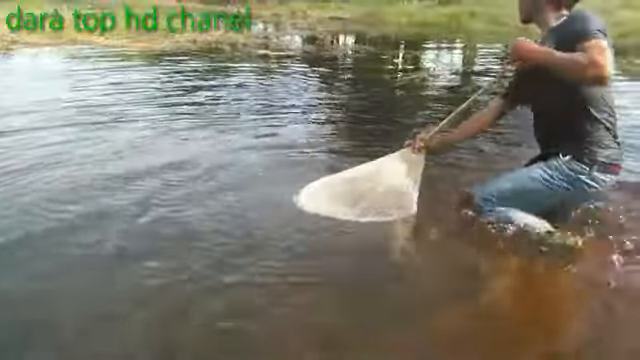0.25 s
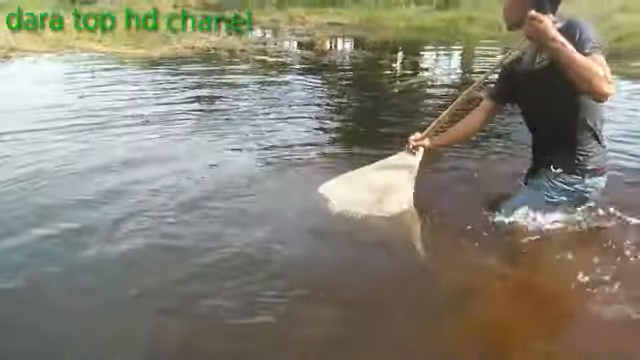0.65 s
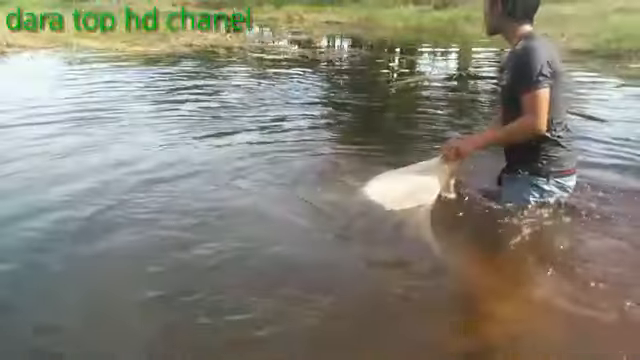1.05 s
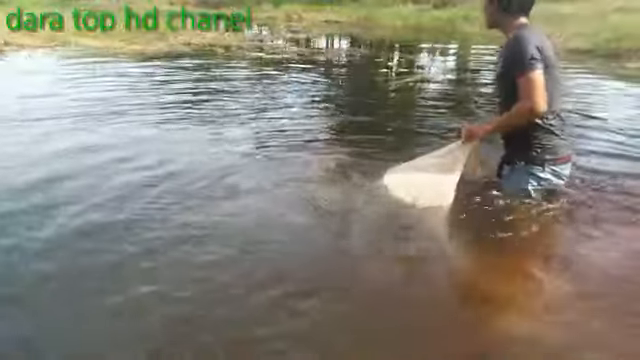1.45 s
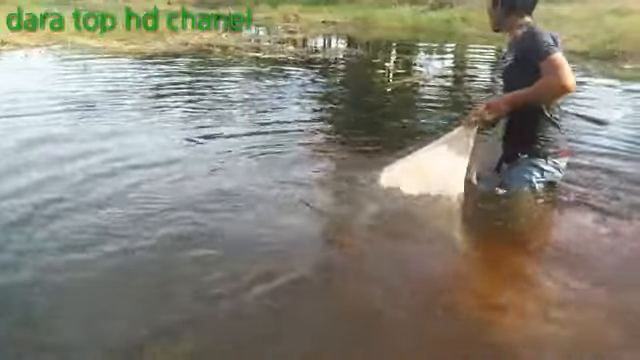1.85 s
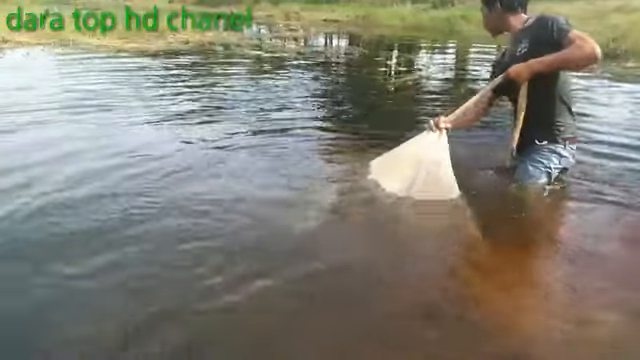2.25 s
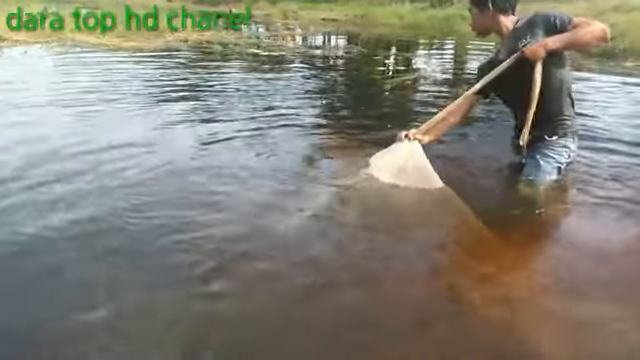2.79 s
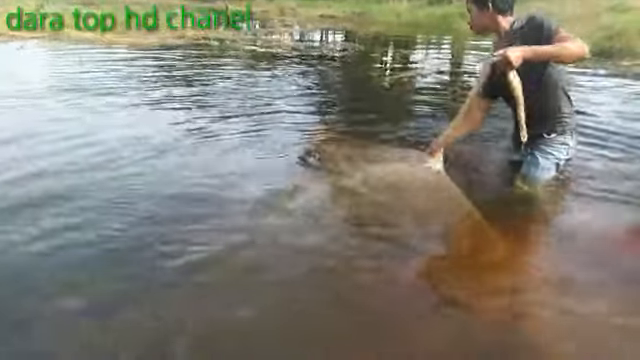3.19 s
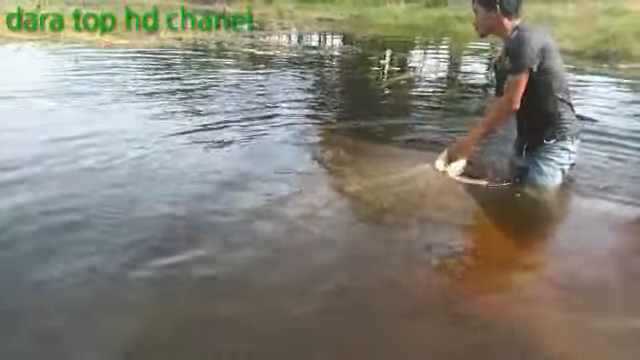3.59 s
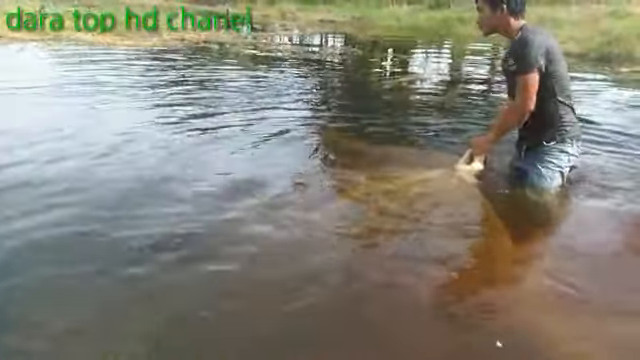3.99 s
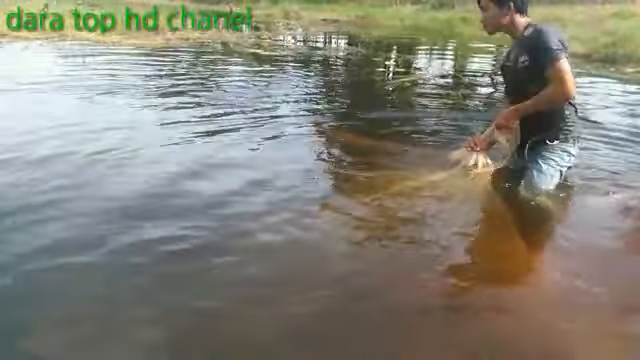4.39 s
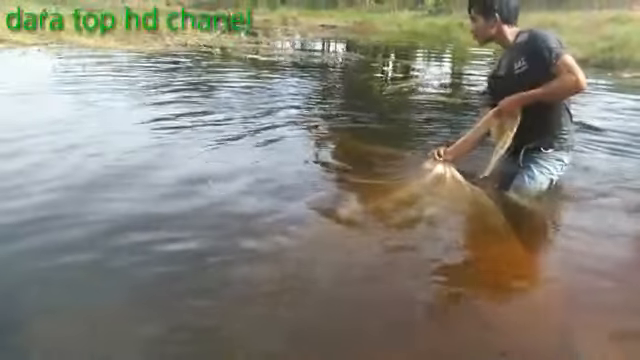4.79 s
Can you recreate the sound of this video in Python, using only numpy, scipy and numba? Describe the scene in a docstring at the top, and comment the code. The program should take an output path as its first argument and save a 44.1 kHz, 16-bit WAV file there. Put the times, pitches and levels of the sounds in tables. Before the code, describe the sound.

A net is hauled through a shallow pond, close to the microphone and slightly right. From about 0.2 to 1.2 seconds the water splashes, gurgles and fizzes around legs and mesh, strongest near half a second. Softer gurgles and drips follow until about 2.4 seconds, then sparse drops and a thin draining hiss, with another small slosh from 4.5 to 5 seconds. Throughout, a one-cylinder pump engine thumps on the left, about eight beats a second. A faster engine throbs farther off, swelling with raspy barks between 1.7 and 2.5 seconds. Sharp dry ticks sound close on the left at the very start, twice around 0.75 seconds and at 3.9. On the right, a frog trills briefly near 2 and 4.5 seconds, and a bird chirps faintly at 2.3 and around 4 to 4.7. Light wind, low distant rumble and very faint insects lie underneath.

```python
"""A shallow pond, where a net is hauled through the water just right of a camera.
Bubbles ring as damped oscillators, so the water gurgles, drips and fizzes around legs and mesh.
Firings excite exhaust resonances: a slow one-cylinder pump engine thumps on the left bank, and a
faster engine throbs further off and barks when revved. A frog trills twice, a bird chirps and
insects sing; a few sharp ticks sound close by, over light wind and distant noise."""
import sys
import numpy as np
from scipy import signal
from scipy.fft import rfft, irfft
from scipy.io import wavfile
from scipy.ndimage import uniform_filter1d, map_coordinates
from numba import njit

SR = 44100
rng = np.random.default_rng(int(sys.argv[2]) if len(sys.argv) > 2 else 0)


def int16_out(signal):
    """Quantize to a 16-bit WAV file."""
    q = np.round(np.clip(np.atleast_2d(signal).T, -1, 1) * 32767)
    wavfile.write(sys.argv[1], SR, q.astype(np.int16))


N = 222352
TOP_HZ = 15950  # upper band limit


def undb(db):
    """Amplitude ratio of a level in decibels."""
    return 10 ** (np.asarray(db, float) / 20)


def unit(x):
    """Normalisation to an RMS of 1."""
    return x / np.sqrt(np.mean(x ** 2))


def curve(table):
    """Linear interpolation in time: one signal for each column after t/s."""
    s, *columns = np.transpose(table)
    return [np.interp(np.arange(N) / SR, s, column) for column in columns]


def on_log(table, hz):
    """Interpolation on a logarithmic frequency axis."""
    f, values = np.transpose(table)
    return np.interp(np.log(hz), np.log(f), values)


def band(x, hz, width):
    """Second-order resonance with gain 1 at its centre."""
    return signal.lfilter(*signal.iirpeak(hz, hz / width, SR), x)


def steep_band(x, hz, width):
    """Two equal resonances in cascade."""
    return band(band(x, hz, width), hz, width)


def walk(rate):
    """Random modulation: values held for 1 / rate s and smoothed twice; spread near 1."""
    hold = int(SR / rate)
    steps = np.repeat(rng.standard_normal(N // hold + 1), hold)
    return 1.3 * uniform_filter1d(uniform_filter1d(steps, hold), hold)[:N]


@njit
def add_rings(out, start, hz, t60, rise, glide, left, right, lag):
    """Superposition of decaying sinusoids, each gliding by a share of its frequency over its t60."""
    for k in range(len(start)):
        length, phase = t60[k] * SR, 0.
        for n in range(int(length)):
            i = start[k] + n
            if i + lag >= out.shape[1]:
                break
            phase += 2 * np.pi * hz[k] * (1 + glide[k] * n / length) / SR
            swell = (1 - np.exp(-(n + 1) / (rise[k] * SR))) ** 2
            pressure = np.sin(phase) * 1000 ** (-n / length) * swell
            out[0, i + lag] += left[k] * pressure
            out[1, i] += right[k] * pressure


def rings(s, hz, db, t60, pan_db, rise=1e-4, glide=0., lag=0):
    """Damped oscillators at two microphone ports: pan is left minus right; left is `lag` samples late."""
    out = np.zeros((2, N))
    columns = np.broadcast_arrays(s, hz, db, t60, pan_db, rise, glide)
    s, hz, db, t60, pan_db, rise, glide = (1. * column for column in columns)
    left, right = undb(db + pan_db / 2), undb(db - pan_db / 2)
    add_rings(out, (s * SR).astype(np.int64), hz, t60, np.maximum(rise, 1e-5), glide, left, right, lag)
    return out


def shade(hz):
    """Acoustic shadow of the camera: left minus right falls 2 dB per octave above 600 Hz."""
    return -2 * np.maximum(np.log2(hz / 600), 0)


def wobble(x, depth_s, rate):
    """Phase modulation: moving water or air varies the path length, which roughens the pitch."""
    place = np.arange(N) + depth_s * SR * walk(rate)
    return np.array([map_coordinates(port, [place], order=3, mode="nearest") for port in x])


def bubbles(count, centre_hz, octaves, cycles, spread_db, pan_db, pan_spread_db, lag):
    """Bubble resonance in a crowd: each of uneven size, ringing about `cycles` periods and gliding up."""
    when, pitch, size, side, life = rng.random((count, 5)).T
    hz = np.broadcast_to(centre_hz, N)[(when * N).astype(int)] * 2 ** (octaves * (pitch - .5))
    t60 = cycles * (.5 + life) / hz
    db = -spread_db * np.log(1 - size)
    pan = pan_db + pan_spread_db * (2 * side - 1)
    return unit(rings(when * N / SR, hz, db, t60, pan, rise=0.044 / hz, glide=0.068, lag=lag))


def wash():
    """Bubble resonance rises as size falls: air pockets gurgle, the surface sloshes, fine drops fizz."""
    # moving water: t/s, gurgle level/dB, slosh level/dB
    water_levels = [(0, -45, -50), (.15, -49.5, -49.5), (.3, -39, -39.5), (.42, -41, -36.5),
                    (.53, -46.5, -37.5), (.67, -39.5, -39.5), (.86, -36.5, -39.5), (.95, -45.5, -48),
                    (1.15, -50.5, -52.5), (1.25, -57, -50.5), (1.6, -50, -60.5), (1.72, -41.5, -48),
                    (1.86, -54, -50.5), (2.05, -41.5, -47.5), (2.27, -42.5, -48.5), (2.36, -42.5, -44),
                    (2.44, -50.5, -51.5), (3.0, -53, -58), (3.85, -50.5, -59.5), (4.2, -57.5, -63),
                    (4.47, -50.5, -55.5), (4.55, -49, -50.5), (4.78, -55.5, -57), (4.86, -45, -52),
                    (5.04, -48, -50.5)]
    # pockets of air under the net: t/s, f/Hz
    pocket_pitch = [(0, 654), (.9, 650), (1.1, 670), (2.3, 625), (4.4, 503), (4.75, 670), (4.85, 830),
                    (5.04, 780)]
    # bubble sizes that the slosh favours: f/Hz, spread/octaves, level/dB
    slosh_bands = [(1098, 0.2, -10), (1896, 0.58, -2), (2563, 0.41, -1.5), (3220, 0.48, -10)]
    gurgle_db, slosh_db = curve(water_levels)
    gurgle_hz, = curve(pocket_pitch)
    fizz_db = -48 + 0.85 * (slosh_db + 40)  # follows the slosh
    lumps_db = 1.5 * walk(35)
    gurgle = bubbles(2000, gurgle_hz, 0.29, cycles=8.5, spread_db=2, pan_db=-.5, pan_spread_db=12, lag=2)
    glug = bubbles(1200, 460, octaves=1, cycles=7.4, spread_db=2, pan_db=3, pan_spread_db=1, lag=1)
    crackle = bubbles(30000, 1830, 2.14, cycles=23, spread_db=-1.5, pan_db=2.5, pan_spread_db=92, lag=6)
    slosh = sum(
        undb(db) * bubbles(1500, hz, octaves, cycles=40, spread_db=2, pan_db=-2.5, pan_spread_db=13, lag=6)
        for hz, octaves, db in slosh_bands)
    fizz = bubbles(18000, 5030, 1.71, cycles=25, spread_db=1.5, pan_db=-4, pan_spread_db=28, lag=6)
    plinks = bubbles(900, 2186, 1.49, cycles=25, spread_db=2.5, pan_db=0, pan_spread_db=16, lag=5)
    deep = (gurgle + undb(-12) * glug) * undb(gurgle_db)
    surface = (unit(slosh) + undb(-4.5) * crackle + undb(-12.5) * plinks) * undb(slosh_db)
    return (deep + surface + fizz * undb(fizz_db)) * undb(lumps_db)


def drops():
    """Single bubbles resonate, along with a few rattles from the fast engine's hard firings; the moving surface
    modulates them and scatters a short blur after them."""
    # prominent bubbles: t/s, f/Hz, level/dB, t60/s, glide as a share of f # the rows at 1.698 s, 1.963 s and
    # 2.025 s are instead ringing rattles set off by the fast engine's hard firings
    single_bubbles = [(.051, 2170, -31.5, 0.071, -0.21), (0.21, 2670, -21, 0.0091, 0.21),
                      (.229, 676, -10.5, 0.078, 0.74), (.311, 1780, -31, 0.018, -0.2),
                      (0.33, 2540, -25, 0.022, 0.048), (.345, 1720, -9, 0.0232, 0.56),
                      (0.387, 1780, -23, 0.016, 0.076), (.418, 2010, -27, 0.019, 0.52),
                      (.422, 617, -24, 0.25, -0.75), (0.433, 2820, -19.5, .025, 0.039),
                      (0.472, 5140, -23, 0.015, 0.009), (.478, 5000, -24, 0.016, 0.34),
                      (0.485, 4050, -32, 0.016, 0), (.483, 1810, -21, 0.016, 0.072),
                      (0.467, 1230, -23.5, 0.075, -0.39), (.513, 5140, -37, 0.015, -0.087),
                      (.517, 5070, -15, 0.024, 0.2), (0.517, 2560, -20, 0.024, 0.25),
                      (.534, 5200, -35, .015, -0.27), (.54, 5040, -24, .015, 0.0069),
                      (.547, 4800, -26, .012, 0.14), (0.539, 2850, -20, .015, -0.086),
                      (0.552, 2460, -20, 0.017, -0.24), (.567, 6300, -34, 0.0066, -0.39),
                      (.569, 5000, -23, .01, -0.1), (0.577, 2520, -28, 0.047, -0.44),
                      (.596, 885, -15.5, 0.031, -0.73), (0.602, 2420, -25, 0.012, 0.17),
                      (.612, 2740, -20, 0.019, -0.23), (0.62, 500, -4, 0.015, 0.98),
                      (.621, 1850, -26, 0.013, -0.22), (.66, 2200, -24, 0.019, .2),
                      (.69, 2520, -24, .02, 0.095), (0.721, 525, -19, 0.049, -0.16),
                      (.896, 1530, -25, .02, -0.31), (0.927, 1070, -24.5, 0.023, .1),
                      (0.939, 1400, -31, 0.03, 0), (1.096, 1310, -35, 0.049, -0.17),
                      (1.112, 1480, -38, 0.042, 0), (1.117, 680, -30.5, 0.05, 0.0093),
                      (1.14, 1430, -37, 0.034, -0.2), (1.18, 948, -38.5, 0.03, 0.15),
                      (1.263, 547, -33, 0.054, 0.2), (1.963, 2400, -26, 0.054, -0.36),
                      (2.025, 3080, -46, 0.018, -0.036), (4.182, 2770, -27.5, 0.0065, 0.59),
                      (4.182, 4160, -35, 0.014, -0.47), (4.737, 1254, -35, 0.018, -0.54),
                      (4.748, 2980, -41, 0.058, -0.31), (4.758, 1610, -49, 0.12, 0),
                      (4.85, 2740, -46, 0.124, 0.37), (4.896, 802, -32.5, 0.14, -0.0049),
                      (4.91, 430, -33.5, 0.19, 0.33), (4.937, 790, -34.5, 0.12, -0.012),
                      (5.007, 807, -36.5, 0.31, 0.41), (5.011, 420, -29.5, 0.052, 0.26),
                      (4.894, 4670, -33, .012, 0), (4.896, 3600, -34, 0.018, 0.43),
                      (4.794, 5070, -33, .012, 0), (4.783, 3320, -38, 0.02, 0.39),
                      (.434, 798, -17.5, 0.086, -0.29), (.443, 2300, -17, 0.024, 0.27),
                      (.458, 593, -20.5, 0.063, 0.25), (0.461, 2050, -9, 0.0219, -0.44),
                      (0.474, 1794, -10.5, 0.02, 0.035), (.48, 2600, -18, 0.021, 0.43),
                      (0.503, 1146, -19, 0.044, 0.38), (0.506, 2010, 4.5, 0.0043, 0.51),
                      (0.507, 672, -12.5, 0.039, -0.48), (.601, 610, -14.5, 0.03, 0.59),
                      (0.615, 1410, -18, 0.012, 1), (0.627, 2230, -17, 0.026, 0.84),
                      (.642, 664, -12.5, 0.038, 0.2), (.7, 2430, -27, 0.044, 0.13),
                      (.18, 887, -34, 0.054, 0.3), (.93, 618, -25.5, 0.061, 0.22),
                      (0.717, 1190, -25, 0.043, -0.41), (0.764, 970, -23, 0.061, -0.046),
                      (.816, 807, -20.5, 0.057, 0.14), (.843, 2400, -12, 0.019, -0.042),
                      (0.843, 1400, -19, 0.024, 0.23), (.859, 696, -21, 0.13, -0.37),
                      (0.866, 2118, -11, 0.0095, 0.029), (0.882, 1236, -25.5, 0.078, -0.07),
                      (0.97, 1040, -19.5, 0.073, 0.099), (0.986, 1420, -20, 0.02, 0.39),
                      (1.036, 528, -16, 0.03, 0.75), (1.064, 636, -23.5, 0.14, -0.17),
                      (1.156, 1370, -32.5, 0.031, -0.45), (1.18, 2870, -19.5, 0.007, 0.4),
                      (1.18, 3990, -22.5, 0.011, 0.33), (1.231, 567, -27.5, 0.065, -0.014),
                      (1.311, 2120, -22, 0.024, -0.064), (1.314, 1186, -24.5, 0.044, 0.14),
                      (1.423, 2330, -36, 0.041, 0.035), (1.651, 926, -23.5, 0.028, 0.032),
                      (1.698, 2288, -25, 0.0194, 0.1), (1.963, 648, -29, 0.068, -0.52),
                      (2.195, 626, -22.5, 0.057, 0.464), (2.341, 880, -25, 0.036, -0.42),
                      (2.647, 2380, -35, 0.02, -0.32), (2.757, 1730, -28, 0.016, 0.3),
                      (2.758, 6400, -24, 0.011, 0.091), (2.98, 2970, -38.5, 0.025, -0.012),
                      (3.19, 4740, -35, 0.017, 0), (3.264, 3840, -32, 0.017, 0.24),
                      (3.265, 2950, -40, 0.017, 0.14), (3.525, 1613, -43.5, 0.059, -0.074),
                      (3.484, 1565, -29.5, 0.038, 0.47), (3.484, 3400, -39, 0.026, 0.24),
                      (3.577, 2400, -42, 0.021, -0.11), (3.769, 523, -30, 0.059, 0.26),
                      (3.854, 1860, -23, 0.0081, 0.24), (4.492, 3130, -36, 0.027, -0.032),
                      (4.561, 2640, -33, 0.042, -0.0059), (4.66, 1146, -22.5, 0.018, -0.13),
                      (4.662, 2810, -18.5, 0.021, 0.48), (4.666, 3480, -27, .015, 0),
                      (4.698, 3250, -21, 0.023, 0.047), (4.796, 2260, -40, 0.03, 0.92),
                      (4.531, 906, -39, 0.11, 0.44), (4.832, 890, -30.5, 0.035, -0.11),
                      (4.881, 2360, -21, 0.011, -0.28), (4.88, 830, -19, 0.027, 0.39),
                      (4.92, 3610, -23.5, 0.014, 0.053), (4.939, 2400, -34, 0.031, 0.15),
                      (4.957, 1256, -36.5, 0.062, 0.074), (4.958, 2600, -33, 0.014, 0.09)]
    s, hz, db, t60, glide = np.transpose(single_bubbles)
    flutter_db = 2.5 * walk(260)
    rise = 0.47 / hz + .02 * t60  # deeper bubbles start more softly
    direct = rings(s - .0025, hz, db, t60, shade(hz), rise, glide, lag=4) * undb(flutter_db)
    direct = wobble(direct, depth_s=.00005, rate=300)
    t, scatter_t60 = np.arange(int(.06 * SR)) / SR, 0.11
    ripples = rng.standard_normal((2, len(t))) * 1000 ** (-t / scatter_t60)
    return direct + undb(-37) * signal.fftconvolve(direct, ripples, axes=1)[:, :N]


def bursts():
    """Band-limited transients: grainy noise swells and decays; higher bursts are wider and rise faster."""
    # short noisy bursts (water slaps, fine spray and a few engine rasps):
    # t/s, peak level/dB, centre f/Hz, t60/s
    noisy_bursts = [(0.2074, -31, 5100, 0.19), (0.307, -33, 2040, 0.21), (.3605, -30, 4870, 0.031),
                    (.428, -36, 2330, .08), (.4594, -13, 1874, 0.2), (0.4715, -27, 4970, 0.15),
                    (0.494, -21, 2020, 0.113), (.5094, -31, 5134, 0.13), (0.537, -33, 4940, 0.036),
                    (0.565, -30, 5100, 0.019), (0.602, -12.5, 1920, 0.13), (0.6206, -23, 2020, 0.074),
                    (0.633, -23, 5070, .03), (0.689, -20.5, 1970, 0.44), (0.758, -21.5, 2050, 0.072),
                    (0.84, -43.5, 1930, .075), (0.871, -36, 8550, 0.15), (1.052, -32, 9350, 0.062),
                    (1.099, -35, 8700, .036), (1.171, -28, 7560, 0.091), (1.283, -38, 8300, 0.35),
                    (1.07, -38, 3100, 0.044), (1.6934, -38, 2282, 0.099), (2.174, -33, 1810, 0.083),
                    (2.345, -41, 1080, .08), (2.3244, -38, 9900, 0.042), (2.3255, -29.5, 2010, 0.15),
                    (2.755, -41, 5760, 0.18), (3.282, -39, 6550, 0.43), (3.527, -38, 8000, 0.17),
                    (3.906, -37, 2150, 0.28), (4.6994, -47, 4970, 0.1), (4.893, -39, 7050, 0.057)]
    out = np.zeros((2, N))
    t = np.arange(int(.3 * SR)) / SR
    flock = bubbles(5000, 2244, 2.45, cycles=6.1, spread_db=1.5, pan_db=-9.5, pan_spread_db=12, lag=5)
    for s, db, hz, t60 in noisy_bursts:
        rise = .008 * np.sqrt(2000 / hz)
        width_hz = hz * min(0.93 * hz / 2000, 1.44)
        i = int((s - rise) * SR)
        noise = rng.standard_normal((2, len(t)))
        grain_db = 0.21 * np.repeat(rng.standard_normal(len(t) // 60 + 1), 60)[:len(t)]
        grains = noise * undb(grain_db) + undb(-8) * np.roll(flock, -i, axis=1)[:, :len(t)]
        burst = steep_band(grains, hz, width_hz) * (1 - np.exp(-t / rise)) ** 2 * 1000 ** (-t / t60)
        port_db = db + shade(hz) * np.array([[.5], [-.5]])
        out[:, i:i + len(t)] += (burst / np.abs(burst).max() * undb(port_db))[:, :N - i]
    return out


def snaps():
    """Impact excitation: each fine droplet sets off six very short rings around a centre frequency."""
    # droplets striking the surface: t/s, level/dB, centre f/Hz
    impacts = [(0.208, -42, 7100), (.265, -42, 8050), (.363, -36, 8100), (.384, -40.5, 7460),
               (.406, -42, 9950), (.414, -35, 9200), (.459, -36, 9000), (.477, -40, 9400),
               (0.503, -34.5, 10400), (.538, -45, 9400), (.566, -32, 9800), (.607, -33, 9900),
               (.633, -39, 8450), (0.647, -40, 8900), (0.885, -38, 10400), (1.055, -33, 9300),
               (1.178, -31.5, 9550), (2.755, -38, 5100), (3.282, -45, 7960), (3.289, -32.5, 5240),
               (3.315, -53, 7900), (3.523, -39.5, 8500), (3.553, -47, 6000), (4.656, -48, 7400),
               (4.679, -50, 8500), (4.705, -53, 7540), (4.778, -47, 11500), (4.864, -43, 7040),
               (4.895, -48, 11550), (4.916, -47, 6000), (5.021, -48, 8500)]
    s, db, centre_hz = (np.repeat(column, 6) for column in np.transpose(impacts))
    late, pitch, side = rng.random((len(s), 3)).T
    octaves, t60 = 1.36, 0.0054
    hz = np.minimum(centre_hz * 2 ** (octaves * (pitch - .5)), TOP_HZ)
    pan_db = shade(hz) / 2 + 8 * (side - .5)
    return rings(s + 0.0019 * late, hz, db + 5.5, t60, pan_db, rise=0.00022, lag=5)


def hiss():
    """Water drains from mesh and clothes: treble noise, incoherent at the ports, with tiny droplets."""
    # draining water: t/s, level/dB
    drain_levels = [(0, -45.5), (.18, -47.5), (.41, -46), (.6, -43.5), (.83, -49.5), (1.14, -48.5),
                    (1.39, -52.5), (1.99, -50), (2.18, -47.5), (2.4, -51), (2.65, -51.5), (2.81, -54),
                    (2.93, -61), (3.19, -60), (3.47, -58.5), (3.54, -49.5), (3.62, -57.5), (3.99, -61.5),
                    (4.49, -62), (4.69, -56), (5.04, -57.5)]
    # its spectrum: f/Hz, relative spectral level/dB
    spectrum = [(3000, -2.5), (5500, -8), (7500, 2.5), (8900, 5), (10000, 3), (14000, 1.5), (16000, -5)]
    f = np.fft.rfftfreq(N, 1 / SR) + 1
    colour = undb(on_log(spectrum, f) - 40 * (f < 2500))
    noise = irfft(rfft(rng.standard_normal((2, N))) * colour, N)
    droplets = bubbles(1200, 9070, 1.03, cycles=10, spread_db=4, pan_db=-5, pan_spread_db=12, lag=5)
    flicker_db, port_db = 1.2 * walk(12), np.array([[-.8], [.8]])
    return (unit(noise) + undb(-15) * droplets) * undb(curve(drain_levels)[0] + flicker_db + port_db)


def slow_engine():
    """Each firing excites the exhaust's modes, slightly detuned; the far bank reflects a dull echo."""
    # firings: t/s, thump level/dB, knock level/dB
    firings = [(0.11, -23.5, -34), (0.237, -25.5, -36), (0.363, -19.5, -33), (0.488, -21, -25),
               (0.616, -20, -23), (0.743, -19.5, -50), (0.864, -27, -39), (0.989, -21.5, -37),
               (1.113, -20, -40), (1.239, -22.5, -39), (1.362, -21, -36), (1.489, -24, -35),
               (1.609, -22.5, -37), (1.736, -19.5, -38), (1.862, -23, -31), (1.987, -25.5, -30.5),
               (2.11, -22.5, -46), (2.231, -19.5, -39), (2.356, -19, -31), (2.476, -21.5, -40),
               (2.6, -19.5, -31.5), (2.724, -31.5, -28.5), (2.843, -26, -31.5), (2.972, -20.5, -34.5),
               (3.09, -23, -31), (3.214, -23, -31.5), (3.333, -24.5, -40), (3.459, -23.5, -30.5),
               (3.581, -22, -37.5), (3.702, -23.5, -38), (3.823, -19.5, -35), (3.943, -27.5, -31),
               (4.067, -23, -36.5), (4.191, -22.5, -38), (4.314, -28, -36), (4.433, -22.5, -33),
               (4.557, -29.5, -35), (4.68, -21, -40), (4.802, -25, -34), (4.923, -21, -34)]
    # exhaust modes: f/Hz, gain/dB, t60/s, pan/dB, rise/cycles
    exhaust_modes = [(202.7, 11.5, 0.037, 3.5, 0.64), (148.4, -0.5, 0.03, -6, 0.74),
                     (548, 2.5, 0.04, -5.5, 1.1), (640, 5, 0.033, -6, 2.5)]
    s, thump_db, knock_db = np.transpose(firings)
    detune = 1 + 0.016 * rng.standard_normal(len(s))
    direct = np.zeros((2, N))
    for hz, gain_db, t60, pan_db, rise_cycles in exhaust_modes:
        # the upper modes knock at a steady pitch; the deep ones thump and climb as they die
        db, glide = (knock_db, 0) if hz > 400 else (thump_db, 0.93)
        direct += rings(s - 0.0016, hz * detune, db + gain_db, t60, pan_db, rise_cycles / hz, glide)
    echo_delay_s = .031
    echo = np.pad(direct, ((0, 0), (int(echo_delay_s * SR), 0)))[:, :N]
    return direct + undb(-21) * band(echo, hz=110, width=180)


def fast_engine():
    """Forced resonance: uneven firings and the gas that rushes after them drive a distant pipe."""
    # engine speed: t/s, firing rate/Hz
    firing_rate = [(0, 19.472), (.7, 18.955), (2.3, 19.051), (4.2, 18.07), (5.04, 18.193)]
    # pipe resonances: f/Hz, width/Hz, gain/dB
    pipe_modes = [(109, 71, 8), (149.2, 7.7, 6.5), (62.3, 175, -8)]
    # the throb as it carries: t/s, level/dB
    throb_levels = [(0, -42), (.3, -41.5), (.9, -36.5), (1.6, -39), (1.75, -30), (2.15, -31), (2.53, -32),
                    (3.3, -39.5), (3.9, -46), (4.1, -42.5), (4.48, -34), (4.62, -38), (5.04, -36)]
    # the pipe's drone as the revs settle: t/s, level/dB
    drone_levels = [(0, -60), (2.0, -40), (2.22, -32.5), (2.62, -31), (2.85, -60), (5.04, -46)]
    firings = .311 + np.cumsum(curve(firing_rate)[0]) / SR
    cycle = np.floor(firings).astype(int)
    strength = undb(3 * rng.standard_normal(cycle[-1] + 1))[cycle]
    pulses = np.diff(cycle, prepend=cycle[0]) * strength
    gas = strength * np.exp(-(firings % 1) / 0.57) * rng.standard_normal(N)
    drive = unit(pulses) + 0.4 * unit(gas)
    pipe = sum(undb(db) * steep_band(drive, hz, 1.28 * width) for hz, width, db in pipe_modes)
    throb = signal.lfilter(*signal.butter(2, 320, fs=SR), pipe)  # distance dulls each firing
    drone = unit(steep_band(drive, hz=157, width=12.6)) * undb(curve(drone_levels)[0])
    return unit(throb) * undb(curve(throb_levels)[0] + walk(5)) + drone


def barks():
    """Noise excitation: hard firings of the fast engine blow gas through the pipe's upper resonances."""
    # firings while revved: t/s, level/dB
    hard_firings = [(1.693, -31.5), (1.738, -29.5), (1.794, -30), (1.838, -34), (1.886, -34.5),
                    (1.926, -46.5), (1.962, -35.5), (2.019, -26), (2.062, -28), (2.116, -36.5),
                    (2.173, -27.5), (2.221, -30.5), (2.274, -31), (2.326, -34), (2.378, -32),
                    (2.478, -37.5)]
    # upper pipe resonances: f/Hz, width/Hz, gain/dB
    upper_modes = [(390, 126, -1.5), (629, 53, -4), (1213, 68, -8), (1780, 170, -9), (2145, 200, -11.5),
                   (3110, 230, -17), (4140, 705, -17.5)]
    rise, t60 = 0.0071, 0.16
    t, envelope = np.arange(int(.2 * SR)) / SR, np.zeros(N)
    puff = (1 - np.exp(-t / rise)) * 1000 ** (-t / t60)
    for s, db in hard_firings:
        i = int((s - rise) * SR)
        envelope[i:i + len(t)] += undb(db) * puff
    both, left, right = rng.standard_normal((3, N))
    gas = both + 0.44 * np.array([left, right])
    return sum(undb(db) * band(unit(band(gas, hz, width)) * envelope, hz, 2 * width)
               for hz, width, db in upper_modes)


def ticks():
    """Impulse responses that begin with a rarefaction: a short knock, a thin ring and a bright edge."""
    # dry cracks close to the left port: t/s, level/dB
    cracks = [(.0703, -17), (.724, -6), (0.7746, -6), (3.9003, -8.5), (4.1766, -36)]
    # their modes: f/Hz, gain/dB, t60/s, pan/dB, rise/s, delay/s
    # the deep knock is conducted through the case to the right port
    modes = [(540, 11.5, .0064, -20, .0028, .0009), (1210, 28, .0015, 20, .0011, .00047),
             (3180, 28, .0013, 20, .0011, .00049), (3630, -13, .007, 20, .00012, .0004),
             (3960, -22, .017, 20, .001, .0005), (5360, -3, .0024, 20, .0004, .00053),
             (9460, -3, .0014, 20, .0002, .0007)]
    s, db = np.transpose(cracks)
    return -sum(rings(s + delay, hz, db + gain_db, t60, pan_db, rise)
                for hz, gain_db, t60, pan_db, rise, delay in modes)


def frog():
    """Amplitude modulation: trains of soft tone pulses from the right swell, fade and climb a little."""
    # trills: loudest t/s, level/dB, first pulse t/s, pulse count, period/s, f/Hz
    trills = [(1.96, -28.5, 1.886, 6, .0302, 2170), (4.54, -36.5, 4.432, 7, .0302, 2215)]
    pulse_s, climb_hz_per_s, fade_db_per_s2 = 0.013, 950, 1100
    out = np.zeros((2, N))
    t = np.arange(int(pulse_s * SR)) / SR
    window = np.sin(np.pi * t / pulse_s) ** 2
    for top, db, first, pulses, period, top_hz in trills:
        for s in first + period * np.arange(round(pulses)):
            hz = top_hz + climb_hz_per_s * (s - top)
            pulse = window * np.sin(2 * np.pi * hz * t) * undb(db - fade_db_per_s2 * (s - top) ** 2)
            for port, lag, gain_db in ((0, 8, 0), (1, 0, 6)):  # the right port is earlier and louder
                i = int((s - .002) * SR) + lag
                out[port, i:i + len(t)] += pulse * undb(gain_db)
    return out


def bird():
    """Falling whistles from the far right, modulated in phase and level by the air on the way."""
    # chirps: t/s, starting f/Hz, level/dB, t60/s, glide as a share of f
    chirps = [(2.25, 6220, -39, 0.048, -0.18), (3.785, 4900, -53.5, 0.044, -.2),
              (4.141, 6800, -50, 0.042, -.4), (4.157, 5830, -52, 0.065, -0.084),
              (4.182, 5100, -47, 0.051, -0.23), (4.663, 6400, -50, 0.095, -0.4)]
    s, hz, db, t60, glide = np.transpose(chirps)
    whistles = rings(s, hz, db, t60, pan_db=-32, rise=0.011, glide=glide)
    return wobble(whistles, depth_s=.00002, rate=300) * undb(4 * walk(250))


def air():
    """Partly coherent ambient noise, in half-octave bands that swell together and flicker alone."""
    # open air: f/Hz, relative spectral level/dB
    spectrum = [(18, -33), (30, 17.5), (65, 6), (246, -1.5), (376, -10), (699, -34.5), (781, -53),
                (892, -13.5), (1060, -39.5), (1660, -24.5), (1890, -48), (2950, -35.5), (6000, -42.5),
                (7800, -67), (13200, -120)]
    # likeness of the ports, with the camera body between them: f/Hz, correlation (0-1)
    port_correlation = [(40, 1), (130, 1), (300, 0.88), (700, 0.25), (1400, 0), (16000, 0.9)]
    out, swell = 0, walk(0.093)
    f = np.fft.rfftfreq(N, 1 / SR) + 1
    correlation = np.clip(on_log(port_correlation, f), 0, 1)
    noise = rfft(rng.standard_normal((2, N))) * undb(on_log(spectrum, f))
    mid, side = noise * np.sqrt([1 + correlation, 1 - correlation])
    for hz in 25 * 2 ** np.arange(0, 8.6, .5):
        share = np.clip(1 - np.abs(2 * np.log2(f / hz)), 0, 1)
        flicker_db = .6 * swell + 3.6 * walk(10)
        out = out + undb(flicker_db) * irfft(share * np.array([mid + side, mid - side]), N)
    return unit(out) * undb(-35)


def breeze():
    """Turbulent pressure: light wind buffets the camera, partly each port on its own."""
    # gusts: peak t/s, level/dB, time to fall 10 dB on either side/s (sign immaterial)
    gusts = [(0, -66, 7), (.5, -43, 3.3), (1.8, -49, 4), (3.26, -48.5, -2.8), (4.0, -58, 6),
             (4.3, -39.5, -0.25)]
    both, left, right = steep_band(rng.standard_normal((3, N)), hz=25, width=59)
    t, calm_db = np.arange(N) / SR, -85
    strength = undb(calm_db) + sum(undb(db - 10 * ((t - s) / fall) ** 2) for s, db, fall in gusts)
    return unit(both + 0.5 * np.array([left, right])) * strength * undb(2 * walk(5.68))


def insects():
    """A far chorus in the grass sums incoherently to gently wavering narrow-band noise."""
    chorus = steep_band(rng.standard_normal((2, N)), hz=8750, width=700)
    return unit(chorus) * undb(-72 + walk(6.3))


def scene():
    """Linear superposition of all sources at the two ports."""
    foreground = wash() + hiss() + bursts() + snaps() + drops()
    engines = slow_engine() + fast_engine() + barks()
    return foreground + engines + ticks() + frog() + bird() + air() + breeze() + insects()


def record(dry):
    """Band limits and saturation: the microphone loses deep bass; the recorder rounds peaks, cuts highs."""
    low_cut_hz, ceiling = 57.1, .95
    heard = signal.sosfilt(signal.butter(4, low_cut_hz, "highpass", fs=SR, output="sos"), dry)
    rounded = heard / (1 + (heard / ceiling) ** 4) ** .25
    return signal.sosfilt(signal.ellip(10, .2, 70, TOP_HZ, fs=SR, output="sos"), rounded)


dry = scene()
out = record(dry)
int16_out(out)
```